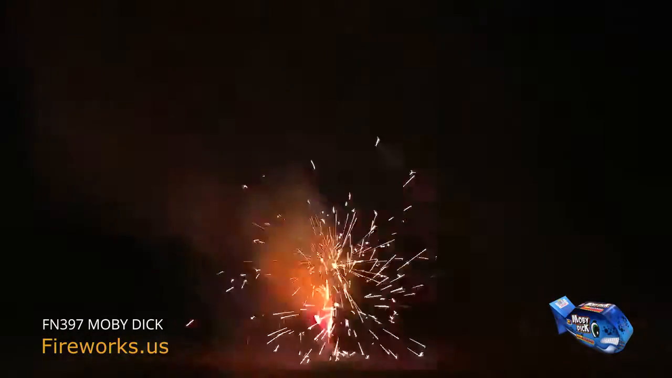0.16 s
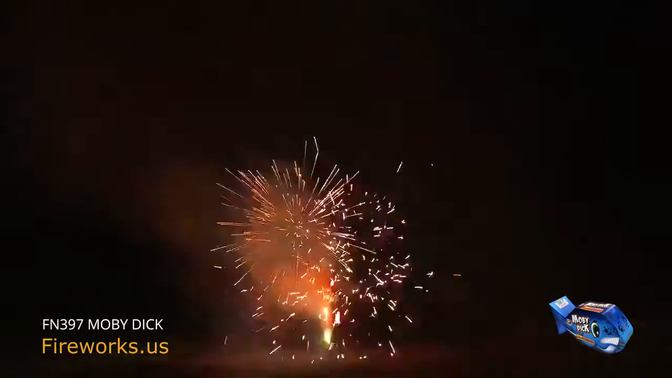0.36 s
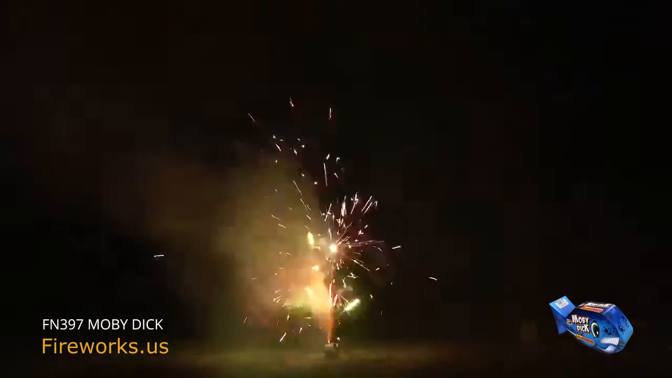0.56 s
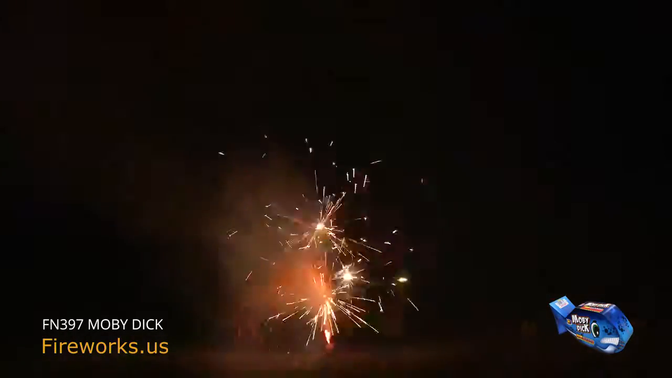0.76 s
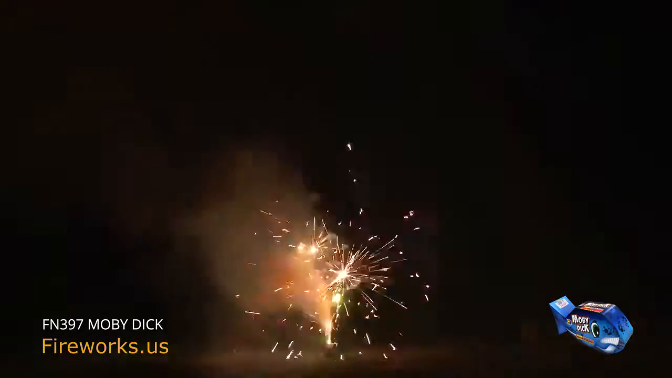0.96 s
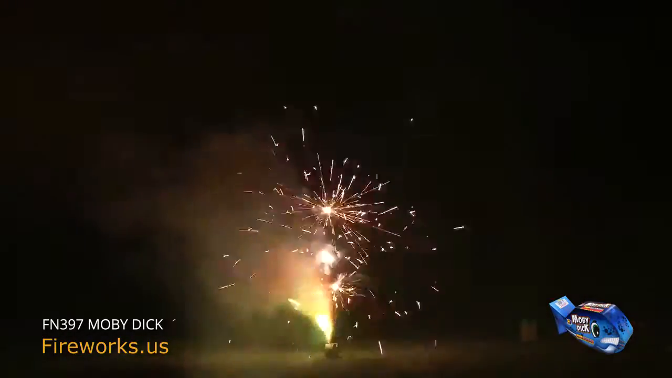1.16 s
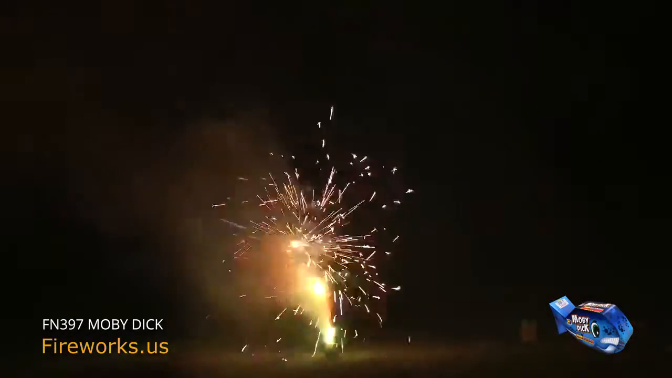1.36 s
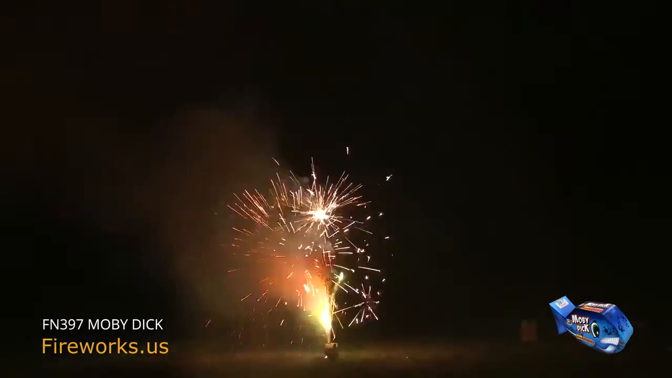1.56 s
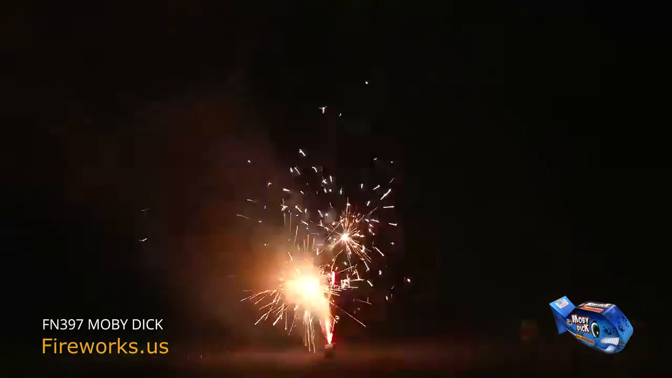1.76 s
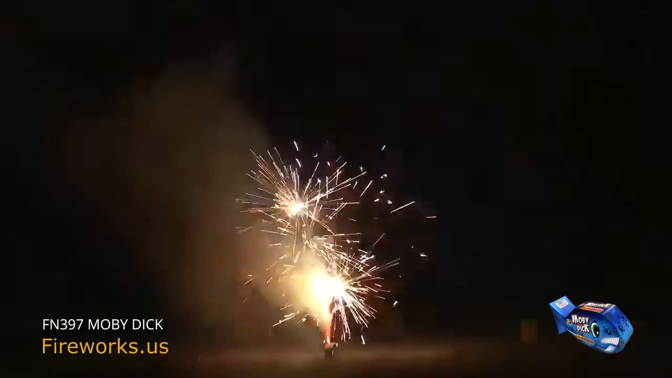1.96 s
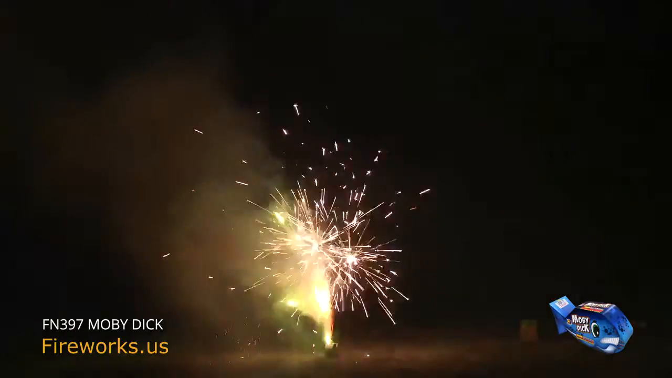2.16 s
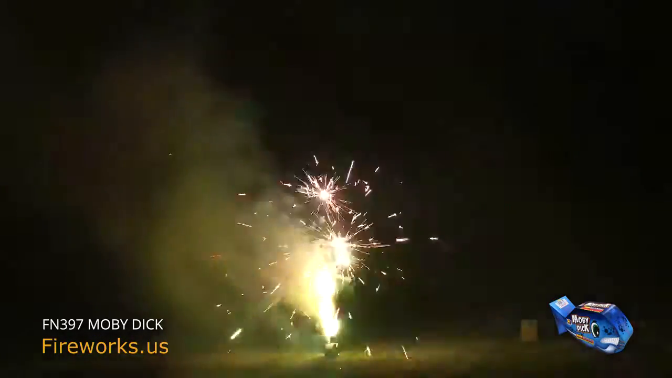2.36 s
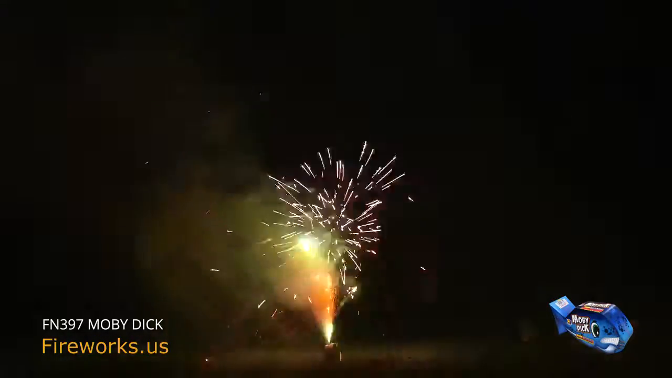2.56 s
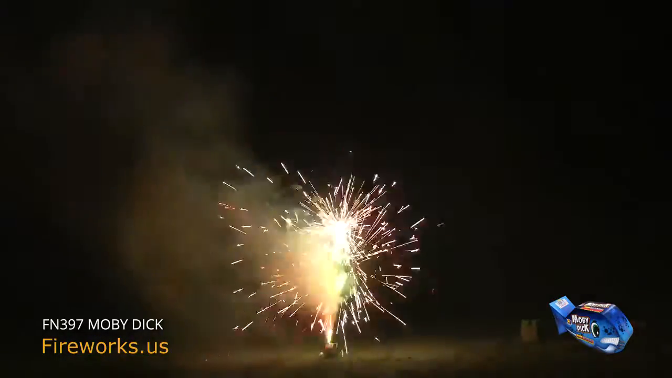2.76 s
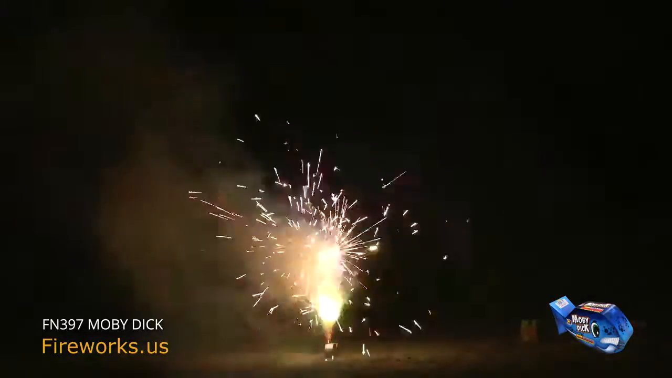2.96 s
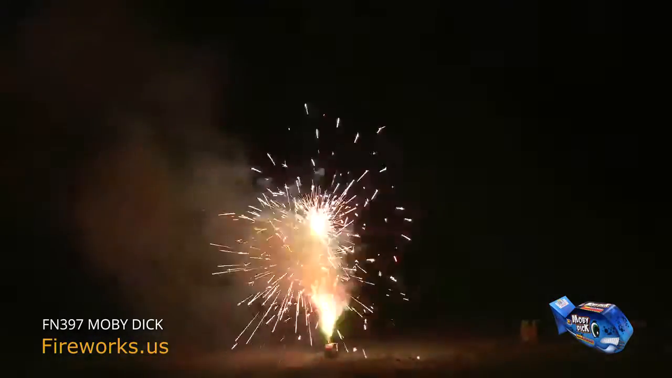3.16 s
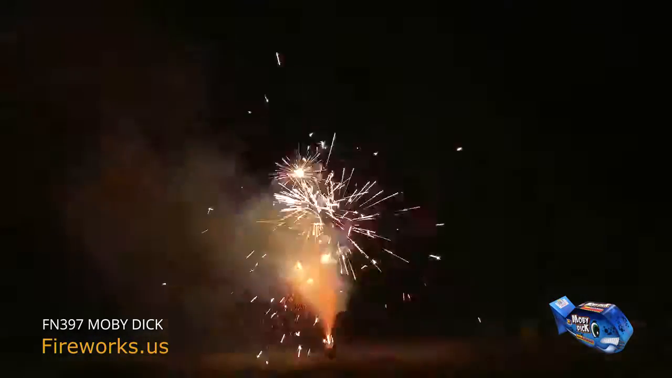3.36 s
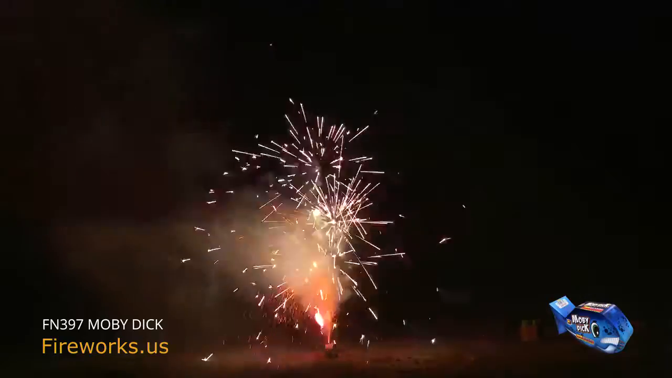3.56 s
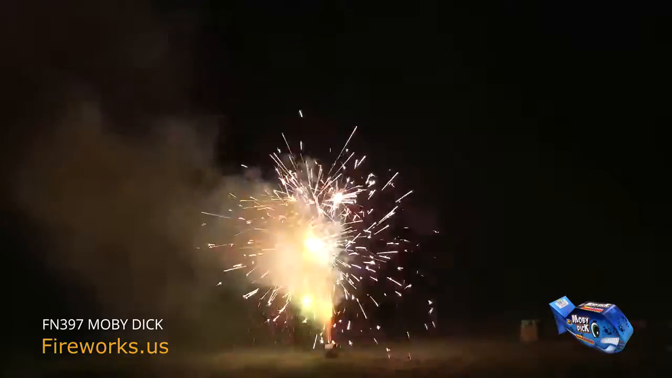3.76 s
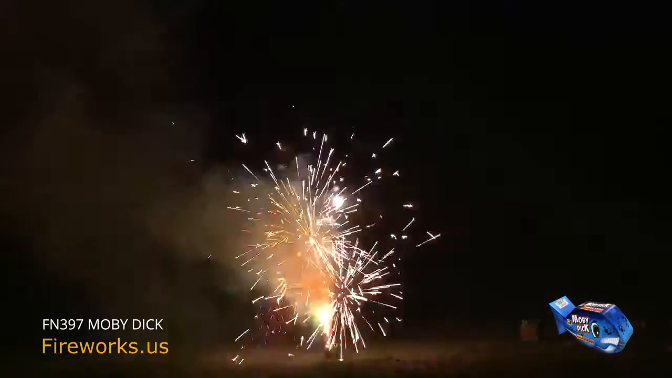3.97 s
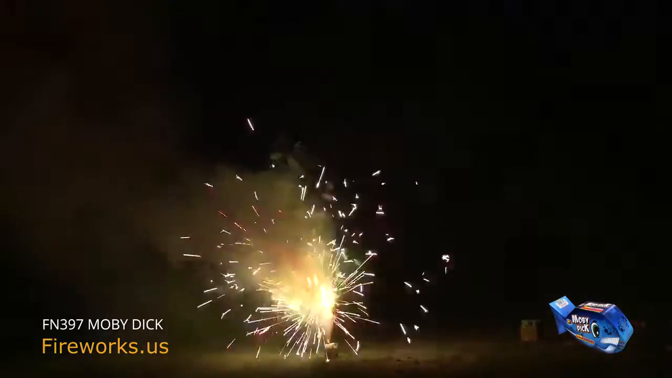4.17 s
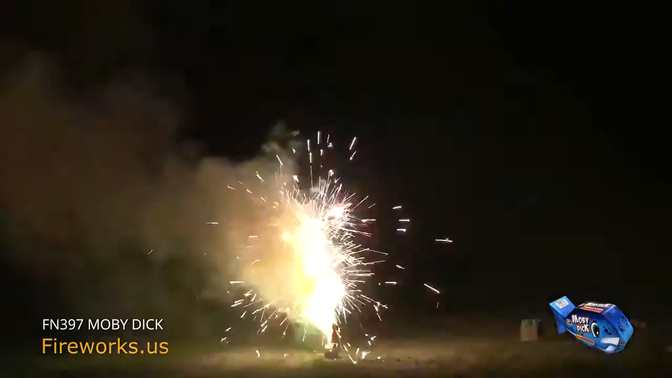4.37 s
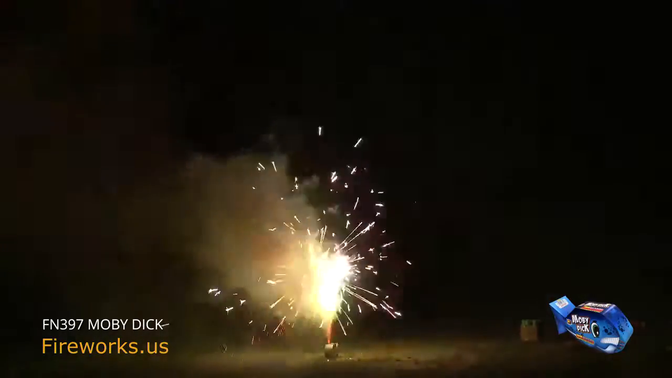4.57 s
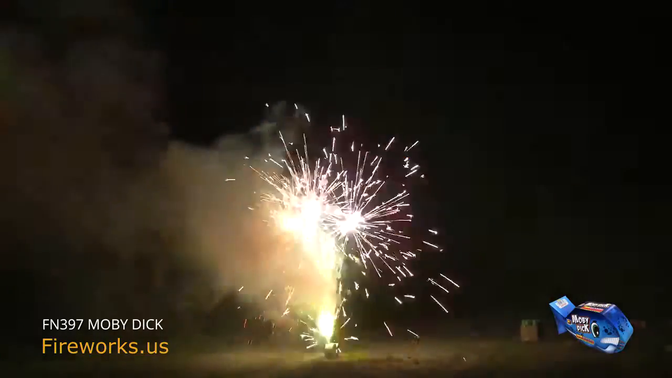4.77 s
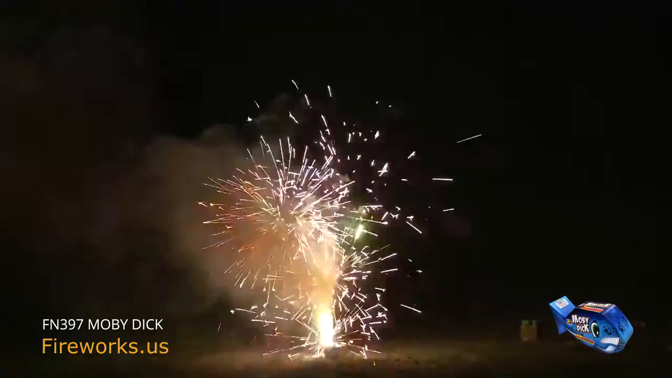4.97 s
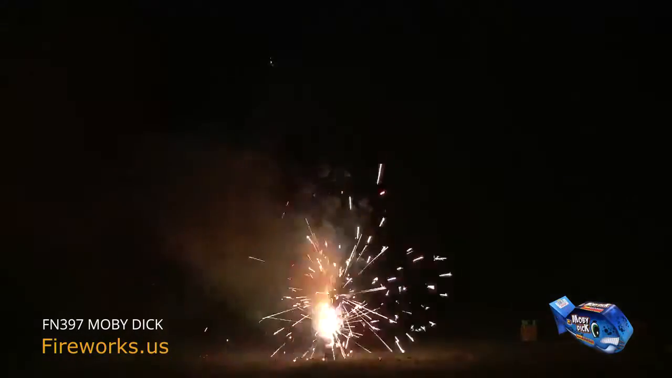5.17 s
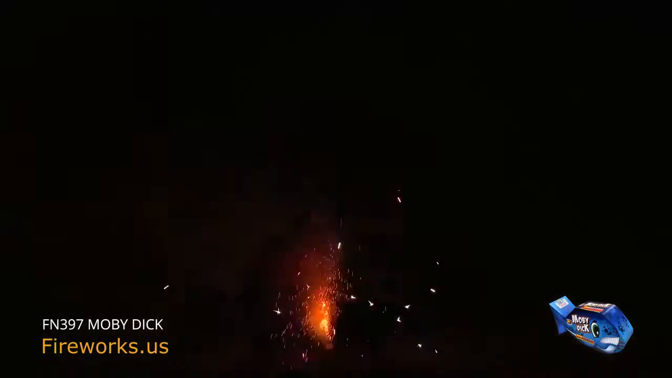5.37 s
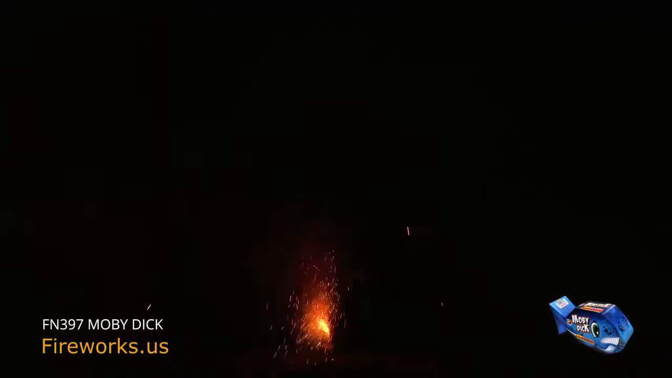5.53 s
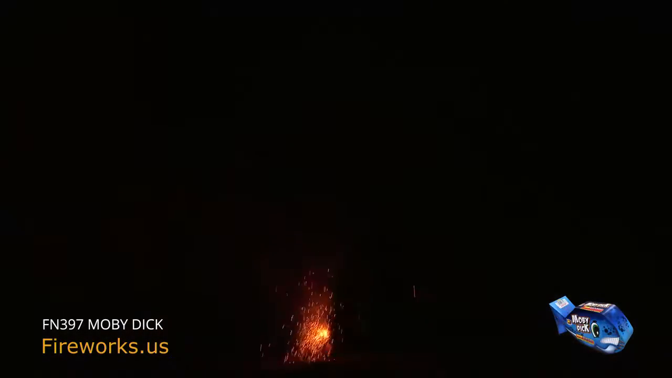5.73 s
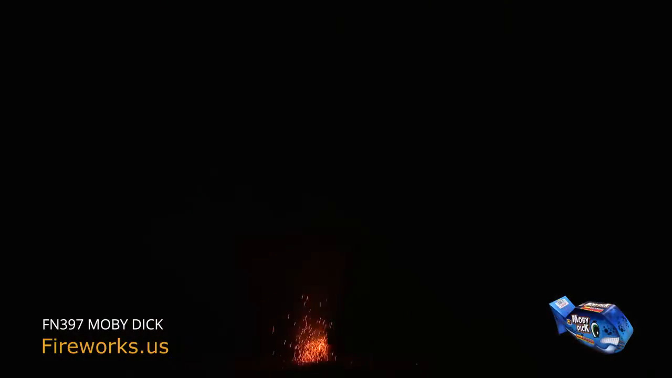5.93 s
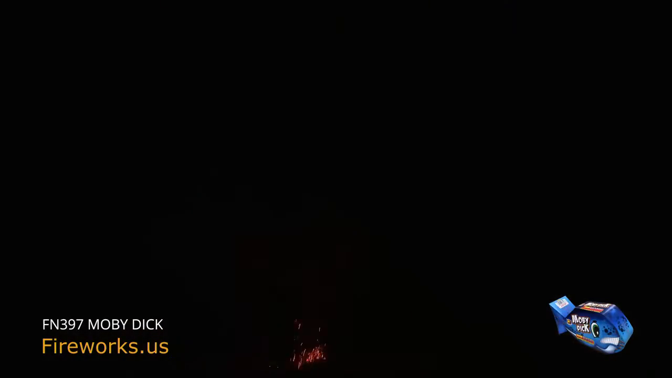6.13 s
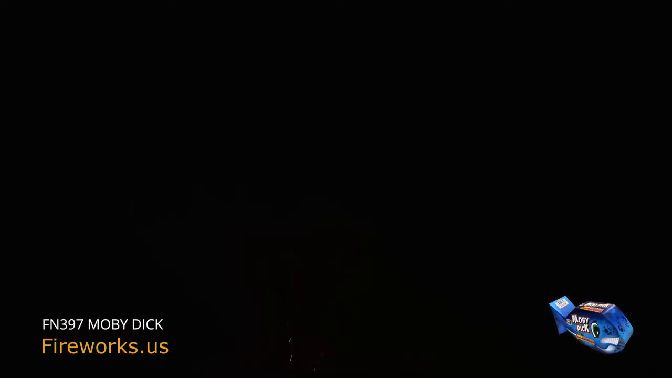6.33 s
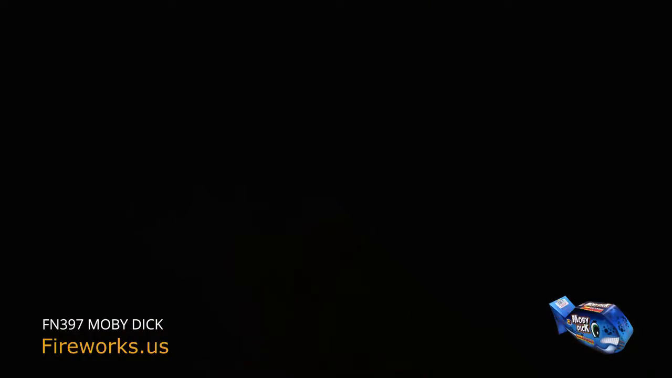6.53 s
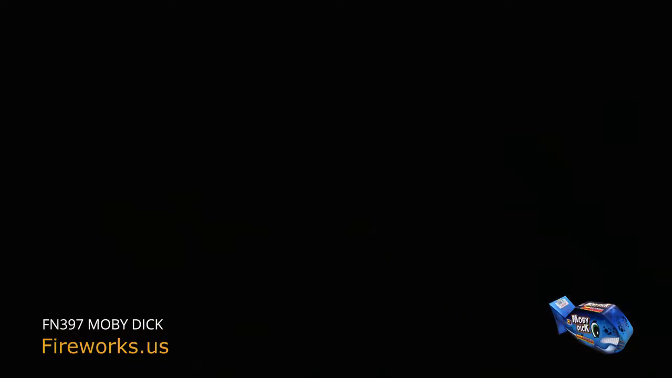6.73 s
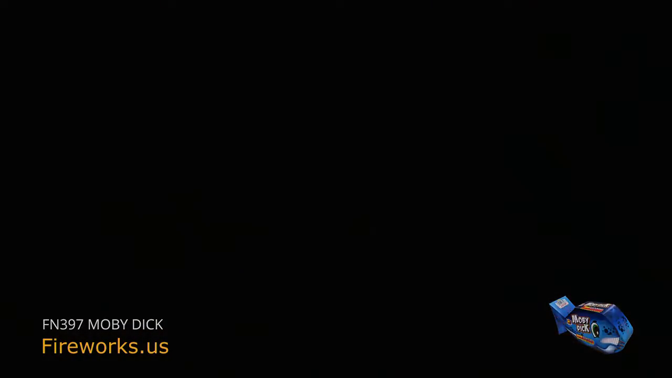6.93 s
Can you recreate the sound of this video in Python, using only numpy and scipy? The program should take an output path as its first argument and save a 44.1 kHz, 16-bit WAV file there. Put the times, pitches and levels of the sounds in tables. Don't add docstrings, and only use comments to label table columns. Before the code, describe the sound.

Loud dry crackling pops from a small fountain firework crowd together outdoors, stop abruptly, and leave fading echoes, soft frog chirps and far traffic.

```python
import sys
import numpy as np
from scipy import signal
from scipy.fft import rfft, irfft, next_fast_len
from scipy.io import wavfile
from scipy.ndimage import map_coordinates

SR = 44100
rng = np.random.default_rng(int(sys.argv[2]) if len(sys.argv) > 2 else 0)


def waveform_to_disk(signal):
    frames = np.transpose(np.atleast_2d(signal))
    scaled = np.clip(frames, -1, 1) * 32767
    samples = np.round(scaled).astype(np.int16)
    wavfile.write(sys.argv[1], SR, samples)


def natural_amplitude(level_db):
    exponent = np.asarray(level_db, float) / 20
    return 10 ** exponent


N = 308700

# (time [s], peak level [dB], ground bounce lag [ms], bounce relative to direct [dB], dullness [dB])
BIG_STARS_EARLY = [(0.13611, -4.1, 0.37, 4.0, 2.0), (0.3496, -3.2, 0.32, -4.0, 1.0),
                   (0.78904, -5.2, 0.48, -9.0, -1.0), (0.81192, -3.0, 0.57, -9.0, -1.0),
                   (1.02443, -6.1, 0.48, -10.0, -2.0), (1.09235, -7.3, 0.3, -2.0, -1.0),
                   (1.24439, -2.7, 0.66, -14.0, -2.0), (1.37955, -3.4, 0.66, -14.0, -3.0),
                   (1.40542, -3.4, 0.4, -6.0, 8.0), (1.41527, -4.9, 0.57, -14.0, 1.0),
                   (1.45022, -6.0, 0.51, -14.0, -5.0), (1.45602, -5.6, 0.57, -13.0, -4.0),
                   (1.50672, -4.2, 0.44, -12.0, 2.0), (1.519, -4.8, 0.57, -9.0, -2.0),
                   (1.52791, -6.3, 0.31, -7.0, -5.0), (1.53465, -2.9, 0.4, -8.0, 1.0),
                   (1.78514, -3.8, 0.5, -10.0, 0.0), (1.814, -4.6, 0.49, -9.0, 2.0),
                   (1.86952, -2.7, 0.4, -7.0, 3.0), (1.89674, -3.5, 0.66, -14.0, -6.0),
                   (1.90018, -2.5, 0.49, -10.0, 2.0), (1.91884, -5.5, 0.41, -10.0, 3.0),
                   (2.18802, -4.1, 0.35, -5.0, 9.0), (2.22675, -4.8, 0.59, -8.0, 2.0),
                   (2.35466, -3.3, 0.49, -11.0, 2.0), (2.37192, -3.2, 0.48, -11.0, 0.0),
                   (2.43904, -3.4, 0.36, -4.0, 6.0), (2.45873, -4.0, 0.72, -14.0, -4.0),
                   (2.63693, -4.7, 0.29, -1.0, -7.0), (2.75016, -4.3, 0.49, -10.0, -1.0),
                   (2.81882, -4.8, 0.4, -9.0, -4.0), (2.86202, -4.8, 0.39, -8.0, -5.0),
                   (2.9085, -4.2, 0.4, -9.0, 1.0), (2.91033, -3.9, 0.48, -13.0, -1.0),
                   (2.91407, -4.0, 0.38, -8.0, 1.0), (2.94667, -3.9, 0.39, -5.0, -3.0),
                   (2.96729, -6.0, 0.39, -4.0, -1.0), (2.98447, -4.5, 0.58, -12.0, -0.0),
                   (3.02355, -4.5, 0.39, -7.0, -1.0), (3.10819, -4.4, 0.53, -14.0, -2.0)]
BIG_STARS_LATE = [(3.22445, -3.2, 0.38, -1.0, 2.0), (3.26277, -4.7, 0.57, -7.0, 1.0),
                  (3.26895, -3.8, 0.6, -11.0, 1.0), (3.31601, -4.0, 0.5, -7.0, -0.0),
                  (3.36229, -4.7, 0.45, -6.0, 1.0), (3.47136, -3.5, 0.46, -10.0, 2.0),
                  (3.49049, -3.3, 0.57, -14.0, -1.0), (3.61573, -8.5, 0.39, 4.0, -2.0),
                  (3.63132, -2.7, 0.66, -9.0, 1.0), (3.66129, -5.6, 0.38, -7.0, -4.0),
                  (3.69473, -6.6, 0.57, -10.0, 0.0), (3.85262, -4.9, 0.43, -10.0, 2.0),
                  (3.90764, -2.4, 0.39, -6.0, -3.0), (4.05481, -2.8, 0.58, -13.0, -1.0),
                  (4.14769, -4.8, 0.35, -10.0, -7.0), (4.20512, -2.2, 0.53, -13.0, -0.0),
                  (4.21837, -3.1, 0.39, -7.0, -5.0), (4.24954, -5.3, 0.37, -7.0, -1.0),
                  (4.51639, -4.0, 0.45, -10.0, 0.0), (4.5809, -5.5, 0.49, -6.0, 2.0),
                  (4.5822, -3.4, 0.43, -11.0, -1.0), (4.58609, -5.2, 0.46, -2.0, 6.0),
                  (4.59981, -3.8, 0.49, -6.0, -2.0), (4.71012, -3.3, 0.49, -1.0, 1.0),
                  (4.73528, -5.9, 0.38, -5.0, -2.0), (4.80389, -3.2, 0.38, -7.0, 0.0),
                  (4.84886, -5.4, 0.3, -5.0, -7.0), (4.87214, -4.5, 0.52, -7.0, -0.0),
                  (4.91015, -3.7, 0.49, -7.0, -2.0), (4.91891, -3.0, 0.58, -4.0, 3.0),
                  (4.93194, -3.3, 0.49, -10.0, 1.0), (4.96973, -3.0, 0.48, -6.0, 2.0),
                  (4.9841, -3.8, 0.5, -3.0, 3.0), (5.06316, -4.6, 0.49, -6.0, -2.0),
                  (5.1151, -2.4, 0.41, -8.0, 5.0), (5.14543, -4.0, 0.5, -11.0, -1.0),
                  (5.16091, -3.3, 0.49, -12.0, -6.0), (5.19486, -7.8, 0.39, -12.0, -4.0),
                  (5.3705, -7.1, 0.31, 3.0, -6.0), (5.40805, -6.0, 0.24, -5.0, 1.0)]
# (time [s], peak level [dB], ground bounce lag [ms], bounce relative to direct [dB])
MIDDLE_STARS_EARLY = [(0.00587, -7.2, 0.53, -1.0), (0.08501, -9.6, 0.48, -1.0), (0.1446, -6.0, 0.34, -7.0),
                      (0.17495, -13.0, 0.49, 4.0), (0.25158, -9.2, 0.39, 2.0), (0.27095, -9.9, 0.48, -8.0),
                      (0.28988, -10.9, 0.41, -2.0), (0.51524, -8.2, 0.49, -5.0),
                      (0.52084, -8.2, 0.38, -3.0), (0.93027, -6.7, 0.47, -11.0),
                      (0.9659, -10.1, 0.33, -6.0), (0.97888, -8.4, 0.62, -14.0),
                      (1.00201, -7.1, 0.38, -5.0), (1.04955, -7.2, 0.46, -12.0),
                      (1.08276, -6.0, 0.52, -14.0), (1.10402, -7.9, 0.4, -8.0),
                      (1.15752, -10.2, 0.36, -6.0), (1.17488, -6.2, 0.4, -7.0),
                      (1.28893, -7.4, 0.57, -12.0), (1.3092, -7.1, 0.24, -4.0),
                      (1.34167, -8.8, 0.57, -11.0), (1.39798, -8.1, 0.35, -8.0),
                      (1.40262, -7.0, 0.54, -13.0), (1.48392, -8.4, 0.48, -10.0),
                      (1.54756, -11.2, 0.66, -7.0), (1.61896, -6.5, 0.57, -13.0),
                      (1.68967, -8.3, 0.54, -14.0), (1.74706, -7.2, 0.4, -8.0), (1.81175, -7.7, 0.4, -7.0),
                      (1.85308, -8.6, 0.39, -12.0), (1.96652, -8.1, 0.37, -5.0), (1.97825, -8.4, 0.4, -8.0),
                      (2.07935, -8.9, 0.68, -14.0), (2.10238, -8.3, 0.52, -11.0),
                      (2.16494, -7.8, 0.5, -11.0), (2.17119, -6.7, 0.51, -11.0),
                      (2.21777, -7.1, 0.48, -7.0), (2.22987, -6.8, 0.49, -10.0),
                      (2.25746, -9.0, 0.78, -14.0), (2.29855, -9.0, 0.39, -4.0), (2.3086, -8.8, 0.6, -10.0),
                      (2.39165, -8.5, 0.49, -13.0), (2.39471, -8.5, 0.39, -8.0),
                      (2.44941, -5.1, 0.49, -9.0), (2.49134, -8.2, 0.48, -8.0), (2.52149, -6.4, 0.47, -8.0),
                      (2.59012, -9.4, 0.46, -13.0), (2.59289, -5.2, 0.56, -12.0),
                      (2.68502, -14.0, 0.3, 2.0), (2.81636, -7.9, 0.49, -8.0)]
MIDDLE_STARS_LATE = [(2.84738, -6.8, 0.5, -10.0), (2.8502, -7.7, 0.29, 0.0), (3.03245, -8.8, 0.46, -9.0),
                     (3.10168, -7.2, 0.37, -7.0), (3.14066, -10.6, 0.31, 1.0), (3.27044, -6.4, 0.37, -4.0),
                     (3.38892, -8.7, 0.5, -7.0), (3.41569, -6.3, 0.48, -12.0), (3.42711, -7.7, 0.48, -4.0),
                     (3.46727, -6.0, 0.52, -8.0), (3.48527, -7.0, 0.47, -12.0), (3.59412, -6.5, 0.61, -7.0),
                     (3.66358, -8.3, 0.35, -9.0), (3.69993, -7.1, 0.39, -6.0), (3.75454, -7.2, 0.63, -11.0),
                     (3.77119, -9.9, 0.58, -11.0), (3.80676, -8.3, 0.57, 4.0), (3.87031, -8.0, 0.48, -7.0),
                     (3.89357, -11.6, 0.38, -2.0), (3.91429, -8.6, 0.47, -5.0), (3.9413, -9.7, 0.46, -10.0),
                     (4.00111, -7.1, 0.54, -10.0), (4.04146, -9.2, 0.41, -9.0), (4.0602, -9.2, 0.4, -12.0),
                     (4.06114, -8.7, 0.48, -9.0), (4.10337, -12.0, 0.74, 4.0), (4.15552, -8.2, 0.48, -8.0),
                     (4.17104, -7.0, 0.51, -7.0), (4.22766, -8.4, 0.49, -12.0),
                     (4.29693, -8.9, 0.48, -13.0), (4.3149, -8.2, 0.37, -6.0), (4.44247, -6.1, 0.39, -8.0),
                     (4.47702, -9.1, 0.37, -3.0), (4.53199, -6.2, 0.37, -7.0), (4.58769, -9.4, 0.37, -4.0),
                     (4.60335, -7.6, 0.33, 0.0), (4.61539, -7.1, 0.4, -10.0), (4.61738, -7.5, 0.4, -7.0),
                     (4.83454, -5.2, 0.39, -7.0), (4.85115, -7.8, 0.47, -7.0), (4.88681, -5.8, 0.39, -6.0),
                     (4.97846, -7.7, 0.47, -8.0), (5.0319, -10.4, 0.44, -9.0), (5.05302, -9.2, 0.58, -4.0),
                     (5.0876, -6.3, 0.4, -6.0), (5.09027, -8.2, 0.38, -9.0), (5.136, -4.7, 0.58, -7.0),
                     (5.24714, -5.7, 0.61, -7.0), (5.30422, -5.6, 0.27, 1.0), (5.32916, -4.9, 0.32, -8.0)]
# (time [s], peak level [dB], ground bounce lag [ms])
SMALL_STARS = [(0.17005, -11.9, 0.49), (0.18306, -14.8, 0.48), (0.29621, -15.1, 0.48),
               (0.37083, -15.5, 0.45), (0.44115, -13.4, 0.47), (0.48971, -11.1, 0.37),
               (0.5549, -12.1, 0.54), (0.70063, -12.0, 0.57), (0.74009, -13.7, 0.47),
               (0.89658, -14.0, 0.38), (1.03502, -10.7, 0.36), (1.09789, -13.8, 0.48), (1.1961, -9.8, 0.44),
               (1.20411, -10.0, 0.46), (1.29478, -12.0, 0.41), (1.57533, -10.8, 0.48),
               (1.62026, -12.3, 0.46), (1.67876, -14.2, 0.39), (1.84969, -12.0, 0.48),
               (1.93414, -12.5, 0.66), (1.99012, -11.6, 0.57), (2.00626, -12.1, 0.36),
               (2.02381, -10.5, 0.49), (2.30336, -13.2, 0.57), (2.42297, -10.6, 0.49),
               (2.50199, -11.9, 0.48), (2.59964, -9.9, 0.56), (2.62766, -10.4, 0.54),
               (2.92626, -12.9, 0.38), (3.13243, -10.9, 0.41), (3.18004, -12.1, 0.39),
               (3.30292, -13.7, 0.32), (3.39324, -11.2, 0.6), (3.42293, -12.2, 0.66), (3.4581, -10.6, 0.56),
               (3.56335, -10.5, 0.58), (3.63848, -11.6, 0.44), (3.66893, -10.1, 0.37),
               (3.85173, -17.6, 0.36), (3.92551, -10.2, 0.58), (3.95399, -14.6, 0.41),
               (3.96053, -11.6, 0.47), (3.96669, -10.1, 0.57), (3.98394, -10.7, 0.58),
               (4.06366, -13.7, 0.44), (4.07692, -11.1, 0.47), (4.09358, -13.0, 0.38),
               (4.16714, -12.9, 0.32), (4.26698, -13.4, 0.38), (4.36887, -9.5, 0.3), (4.42653, -13.3, 0.4),
               (4.50358, -10.9, 0.47), (4.57701, -11.6, 0.37), (4.68795, -10.2, 0.38),
               (4.70273, -10.7, 0.43), (4.76857, -11.3, 0.43), (4.92433, -9.2, 0.48), (4.99558, -12.0, 0.5),
               (5.09682, -11.4, 0.46), (5.39031, -13.7, 0.2)]
# (time [s], peak level [dB])
FAINT_STARS = [(0.06577, -17.8), (0.13172, -13.0), (0.4496, -15.3), (0.46688, -14.7), (0.49361, -17.5),
               (0.66355, -18.0), (0.67603, -13.8), (0.69924, -15.2), (0.74806, -15.9), (0.89872, -19.0),
               (1.23558, -17.6), (1.2512, -17.2), (1.27011, -18.3), (1.31679, -20.4), (1.46611, -15.4),
               (1.63959, -15.8), (1.6723, -17.4), (1.69324, -18.7), (1.83472, -13.2), (1.8907, -17.3),
               (2.14789, -14.2), (2.14984, -17.4), (2.23147, -18.0), (2.30544, -16.0), (2.43705, -14.7),
               (2.7006, -14.5), (2.75588, -13.6), (2.96005, -13.4), (3.18134, -14.9), (3.26761, -13.2),
               (3.32734, -16.0), (3.34068, -14.2), (3.34197, -14.7), (3.60484, -16.9), (3.60862, -16.5),
               (3.71808, -15.1), (3.76525, -19.3), (3.82526, -18.5), (3.84236, -15.4), (3.90117, -17.0),
               (3.99743, -16.0), (4.23187, -17.6), (4.25745, -16.8), (4.3271, -16.5), (4.57168, -16.1),
               (4.64081, -17.2), (4.6533, -15.5), (4.82962, -16.5), (4.99023, -15.5), (5.09536, -22.4),
               (5.1688, -12.7), (5.22961, -14.6), (5.2944, -21.2), (5.348, -23.0), (5.42183, -15.0)]
STRAY_STARS = [.04, .0566, .1639, .3692, .5184, .8039, .8906, 1.0375, 1.1285, 2.1128, 2.1458, 2.2717,
               2.4986, 2.5878, 2.936, 3.0055, 3.1162, 3.2264, 3.5569, 3.676, 4.0191, 4.279, 4.3049, 4.6487,
               4.8382, 5.1024, 5.1481, 5.1501, 5.1742]
# (time [s], peak level [dB])
EMBERS = [(5.4856, -17.5), (5.4829, -25), (5.4935, -9), (5.6473, -12.5), (5.7925, -22)]
# (frequency [Hz], level [dB])
SHOCK_SPECTRUM = [(60, -20), (500, -18), (760, -19.5), (1100, -9.5), (2150, -10.5), (2900, -11.5),
                  (3500, -13.5), (4100, -9.5), (4650, -8.5), (6600, -0.5), (8500, -5.5), (9400, -13.5),
                  (10300, -10), (16500, -27.5)]
# (delay [ms], scatter [ms], level [dB], dulled above [Hz])
WALLS = [
    (1.7, .04, -17, 4000),
    (2.25, .06, -12, 2600),
    (3.3, .1, -12, 2800),
    (24.7, .6, -16.5, 2800),
    (44.8, .3, -20, 9000),
    (60.9, .3, -7.5, 2300),
    (62.2, .6, -13, 2000),
    (64.8, .4, -28, 9000),
    (72.5, 2.5, -17, 3200),
]
# (frequency [Hz], time to decay 60 dB [s])
FIELD_DECAY = [(300, 2.1), (2000, 3.3), (4400, 3.1), (6500, 1.05), (12000, 0.5)]
# (time [s], level [dB])
JET_LEVEL = [
    (0, -50),
    (2, -52),
    (4, -48.5),
    (5.3, -49),
    (5.55, -62),
    (5.95, -95),
]
# (frequency [Hz], level per Hz [dB])
HISS_SPECTRUM = [(500, -26), (2000, -2), (3050, 4), (3550, -5), (4300, 0), (6800, 0), (8700, -2),
                 (10000, -10), (16000, -34)]
# (time [s], peak level [dB], frequency [Hz])
FROG_TICKS = [(5.707, -57, 3020), (5.761, -52, 3100), (5.814, -55, 3120), (5.87, -52, 3100),
              (5.918, -63, 3080), (5.981, -52, 3150), (6.095, -52.5, 3170), (6.203, -54.5, 3190),
              (6.385, -61, 2800), (6.472, -58, 2880), (6.563, -57, 2930), (6.66, -56, 3010),
              (6.733, -60, 7150), (6.766, -54, 3030), (6.874, -53.5, 3000), (6.95, -61, 3250),
              (6.978, -57, 2720), (6.99, -52, 3000)]
# (time [s], length [s], start frequency [Hz], end frequency [Hz], level [dB])
FROG_WHISTLES = [
    (5.86, .25, 2520, 2920, -64.5),
    (6.11, .23, 2630, 3100, -63),
    (6.67, .2, 2540, 2950, -70),
]
# (time [s], firing tone level [dB])
ENGINE_LEVEL = [(0.0, -58), (1.23, -51.5), (1.29, -57), (1.83, -49.5), (2.05, -57), (2.22, -47.5),
                (2.38, -54.5), (2.92, -47.5), (3.16, -67), (3.2, -53.5), (3.61, -54.5), (3.67, -84.5),
                (4.0, -49), (4.66, -62), (4.78, -51), (5.11, -56.5), (6.96, -39)]
# (time [s], level [dB])
ENGINE_LOAD = [(0, 5), (1, -3.5), (4.55, -1), (4.7, 3.5), (5.6, 5.5), (6, 1)]
# (time [s], rumble level [dB], traffic level [dB])
NIGHT_LEVELS = [(0, -51.5, -58.5), (2, -56, -63), (4, -53.5, -59), (5.5, -54.5, -59), (6, -54, -62),
                (6.5, -54.5, -58), (7, -52, -56)]
# (frequency [Hz], level per Hz [dB])
RUMBLE_SPECTRUM = [(25, -26.5), (55, -6.5), (120, -5), (180, -6), (240, -36.5), (400, -65.5)]
TRAFFIC_SPECTRUM = [(150, -7), (400, 0.5), (900, 1.5), (1500, -4), (2300, -20.5), (3600, -31.5),
                    (8000, -32.5), (16000, -45)]

LOW_S = 5.6
STRAY_DB = -23
EMBER_LAG_MS, USUAL_LAG_MS, USUAL_BOUNCE_DB, BOUNCE_LIFT_DB = 0.14, 0.45, -5, 0.5
ROUND_SHARE, ROUND_PER_DB, DULL_SCATTER_DB = 0.23, 0.03, 5
HOUSING_HZ, HOUSING_Q, HOUSING_DB = 6670, 5.6, -8.5
ENGINE_HZ = 75.6
SECOND_DB, SECOND_FOLLOWS = -58.5, 0.37
TOP_HZ = 16700


def unit(x):
    return x / np.sqrt(np.mean(x ** 2) + 1e-20)


def along(points, hz):
    f, v = np.transpose(points)
    return np.interp(np.log(hz + 1), np.log(f + 1), v)


def curves(rows):
    s, *columns = np.transpose(rows)
    return [np.interp(np.arange(N) / SR, s, column) for column in columns]


def wobble(rate):
    knots = rng.standard_normal(int(N * rate / SR) + 4)
    return map_coordinates(knots, [np.arange(N) * rate / SR])


def noise(spectrum):
    m = next_fast_len(N)
    gain = natural_amplitude(along(spectrum, np.fft.rfftfreq(m, 1 / SR)))
    return unit(irfft(rfft(rng.standard_normal(m)) * gain, m)[:N])


def pulses(s, db):
    at = s * SR
    near = np.floor(at)[:, None] + np.arange(-7, 9)
    lag = near - at[:, None]
    shape = natural_amplitude(db)[:, None] * np.sinc(lag) * np.cos(np.pi * lag / 16) ** 2
    index = np.clip(near, 0, N).astype(int)
    return np.bincount(index.ravel(), shape.ravel(), N + 1)[:N]


def dull(x, hz):
    return signal.lfilter(*signal.butter(1, min(hz, SR / 2 - 1), fs=SR), x)


def causal(spectrum, size=2048):
    cepstrum = irfft(np.log(natural_amplitude(along(spectrum, np.fft.rfftfreq(size, 1 / SR)))))
    cepstrum[1:size // 2] *= 2
    cepstrum[size // 2 + 1:] = 0
    pulse = irfft(np.exp(rfft(cepstrum)))[:size // 2]
    return pulse / pulse.max()


def stars():
    rows = [row + (0,) for row in MIDDLE_STARS_EARLY + MIDDLE_STARS_LATE]
    rows += [row + (USUAL_BOUNCE_DB, 0) for row in SMALL_STARS]
    faint = FAINT_STARS + [(s, STRAY_DB) for s in STRAY_STARS]
    rows += [row + (USUAL_LAG_MS, USUAL_BOUNCE_DB, 0) for row in faint]
    rows += [row + (EMBER_LAG_MS, USUAL_BOUNCE_DB, 0) for row in EMBERS]
    rows = np.array(rows)
    rows[:, 3] += 3 * (rows[:, 0] < .75)
    rows[:, 4] = DULL_SCATTER_DB * rng.standard_normal(len(rows))
    return np.vstack([BIG_STARS_EARLY, BIG_STARS_LATE, rows]).T


def crackle():
    s, db, lag_ms, bounce_db, dull_db = stars()
    low = s > LOW_S
    db = db - 3 * low
    rounded = np.clip(ROUND_SHARE + ROUND_PER_DB * dull_db, .01, .95) * (s < LOW_S) + .01
    direct = shock(s, db, rounded) + grazing_tick(s[low], db[low])
    ground_db = db + bounce_db + BOUNCE_LIFT_DB - 20 * low
    bounce = dull(shock(s + lag_ms / 1000, ground_db, rounded), hz=8670)
    lag_ms = np.where(low, 0.18, lag_ms)
    air = direct + bounce + scatter(direct)
    air = air + wall_echoes(s, db, lag_ms, bounce_db, low)
    air = air + natural_amplitude(-23.5) * field(dull(dull(direct + bounce, hz=5890), hz=7000))
    housing = signal.lfilter(*signal.iirpeak(HOUSING_HZ, HOUSING_Q, SR), air)
    air = air + natural_amplitude(HOUSING_DB) * housing
    return natural_amplitude(1.0) * signal.fftconvolve(air, causal(SHOCK_SPECTRUM))[:N]


def shock(s, db, rounded):
    sharp = pulses(s, db + 20 * np.log10(1 - rounded))
    return sharp + dull(pulses(s, db + 20 * np.log10(rounded) + 6), hz=4200)


def grazing_tick(s, db):
    ringing = pulses(s + .15 / 1000, db - 5) - pulses(s + .225 / 1000, db - 6)
    return dull(ringing, hz=9000) - pulses(s + 0.076 / 1000, db + 0.5)


def scatter(direct):
    decay = natural_amplitude(-60 * np.arange(SR // 20) / SR / 0.017)
    fading = signal.fftconvolve(np.abs(direct), decay)[:N]
    return natural_amplitude(-31.0) * fading * dull(rng.standard_normal(N), hz=9000)


def wall_echoes(s, db, lag_ms, bounce_db, low):
    db = db + np.minimum(10 * np.log10(lag_ms / .4), 1)
    echoes = np.zeros(N)
    for delay_ms, scatter_ms, wall_db, hz in WALLS:
        late = s + (delay_ms + scatter_ms * rng.standard_normal(len(s))) / 1000
        facing_db = 8 if delay_ms < 50 else -3
        clear_db = 4 * (s < .75) * (50 < delay_ms < 63)
        chance_db = 2 * rng.standard_normal(len(s))
        echo = pulses(late, db + wall_db + facing_db * low + clear_db + chance_db)
        echo += pulses(late + lag_ms / 1000, db + wall_db + bounce_db - 20 * low)
        echo -= pulses(late[low] + .075 / 1000, db[low] + wall_db + facing_db)
        echo = dull(dull(echo, hz), 1.1 * hz)
        echoes += signal.lfilter(*signal.butter(2, hz / 2.8, 'high', fs=SR), echo)
    return echoes


def field(x):
    hz, t, z = signal.stft(rng.standard_normal(2 * SR), SR, nperseg=256)
    decay = natural_amplitude(-60 * t / along(FIELD_DECAY, hz)[:, None])
    tail = signal.istft(z * decay, SR, nperseg=256)[1]
    return signal.fftconvolve(x, tail / np.linalg.norm(tail))[:N]


def jet():
    hiss_db, = curves(JET_LEVEL)
    spits = (rng.random(N) < 400 / SR) * natural_amplitude(5 * rng.exponential(1, N))
    spit = signal.fftconvolve(spits, causal(HISS_SPECTRUM))[:N]
    return natural_amplitude(hiss_db + 1.5 * wobble(9)) * (noise(HISS_SPECTRUM) + natural_amplitude(-9) * unit(spit))


def frogs():
    out = np.zeros(N + SR)
    t = np.arange(SR // 25) / SR
    swell = (t / .003 * np.exp(1 - t / .003)) ** 2
    for s, db, hz in FROG_TICKS:
        turn = 2 * np.pi * hz * t * (1.02 - 2.5 * t)
        tick = np.sin(turn) + .12 * np.sin(1.55 * turn)
        out[round(s * SR):][:len(t)] += natural_amplitude(db + 1.1) * swell * tick
    for s, length, from_hz, to_hz, db in FROG_WHISTLES:
        u = np.arange(round(length * SR)) / (length * SR)
        turn = 2 * np.pi * np.cumsum(from_hz + (to_hz - from_hz) * u) / SR
        tremble = natural_amplitude(1.8 * wobble(40)[:len(u)])
        out[round(s * SR):][:len(u)] += natural_amplitude(db) * np.sin(np.pi * u) ** 0.4 * tremble * np.sin(turn)
    near = out[:N]
    chorus = noise([(2300, -57.0), (2700, -6.0), (3000, 0), (3250, -20.0), (3500, -65.0)])
    return near + natural_amplitude(-14.5) * field(near) + natural_amplitude(-74.0 + 4.5 * wobble(60)) * chorus


def engine():
    first_db, = curves(ENGINE_LEVEL)
    load_db, = curves(ENGINE_LOAD)
    second_db = SECOND_DB + SECOND_FOLLOWS * (first_db - first_db.mean()) + load_db
    turn = 2 * np.pi * np.cumsum(ENGINE_HZ + .35 * wobble(3)) / SR
    first = natural_amplitude(first_db) * np.sin(turn)
    second = natural_amplitude(second_db + 2.4 * wobble(2.94)) * np.sin(2 * turn)
    flutter = natural_amplitude(first_db - 17) * noise([(20, -12), (38, -10), (60, -21), (90, -55)])
    return np.sqrt(2) * (first + second) + flutter


def distant_traffic():
    rumble_db, traffic_db = curves(NIGHT_LEVELS)
    rumble = natural_amplitude(rumble_db + 1.4 * wobble(3.55)) * noise(RUMBLE_SPECTRUM)
    return rumble + natural_amplitude(traffic_db + 0.63 * wobble(2.6)) * noise(TRAFFIC_SPECTRUM)


def scene():
    return (crackle() + jet() + frogs() + engine() + distant_traffic())[None]


def band_limit(x):
    return signal.sosfilt(signal.butter(12, 17000, fs=SR, output="sos"), x)


def record(dry):
    squeezed = dry / (1 + np.abs(dry / .78) ** 4) ** (1 / 4)
    m = next_fast_len(N)
    fade = np.clip((TOP_HZ + 250 - np.fft.rfftfreq(m, 1 / SR)) / 500, 0, 1)
    mix = irfft(rfft(squeezed, m) * fade, m)[:, :N]
    return band_limit(mix)


dry = scene()
out = record(dry)
waveform_to_disk(out)
```